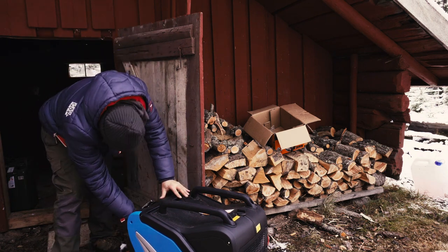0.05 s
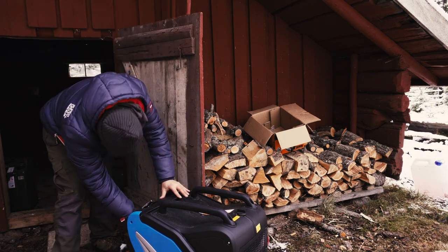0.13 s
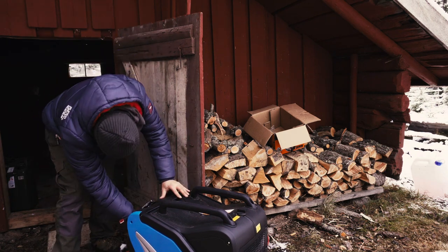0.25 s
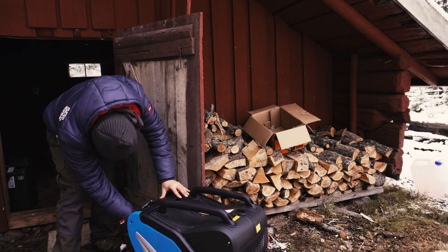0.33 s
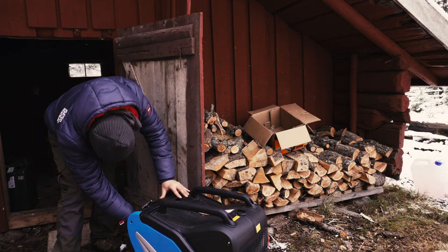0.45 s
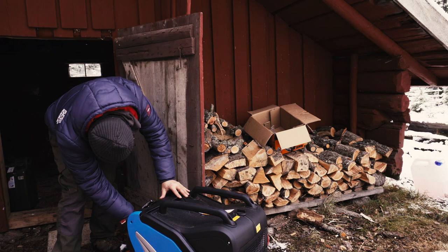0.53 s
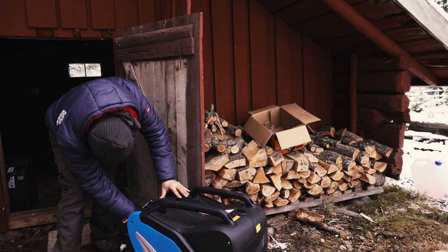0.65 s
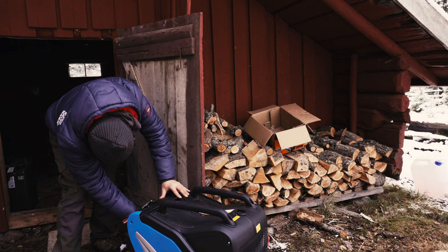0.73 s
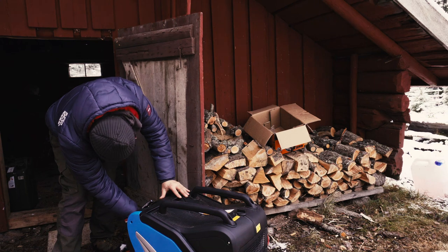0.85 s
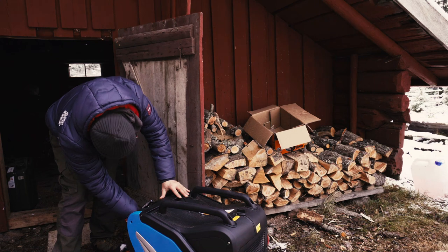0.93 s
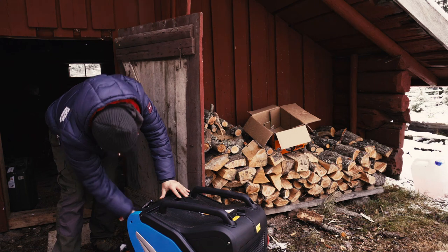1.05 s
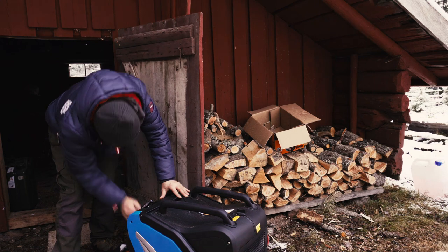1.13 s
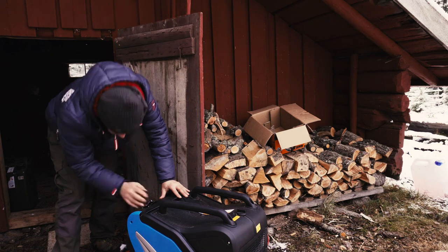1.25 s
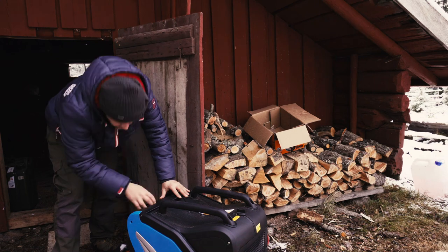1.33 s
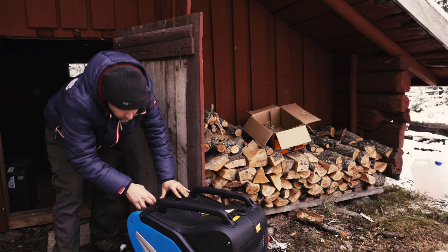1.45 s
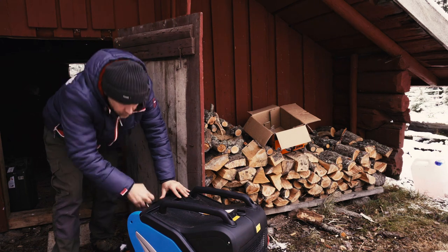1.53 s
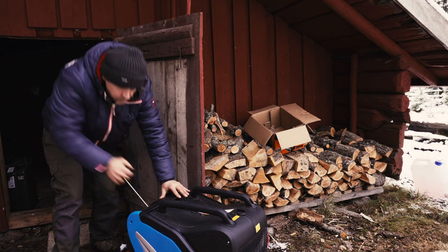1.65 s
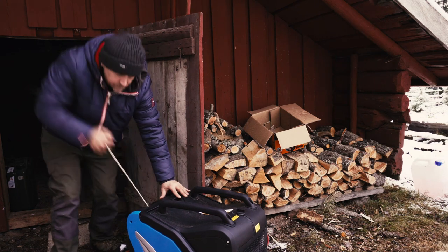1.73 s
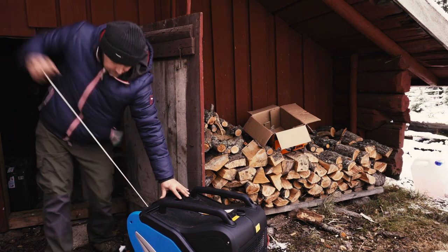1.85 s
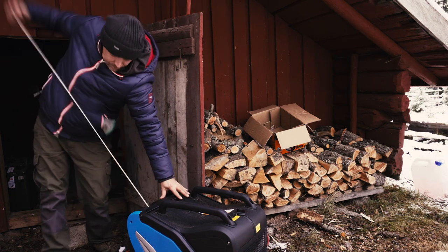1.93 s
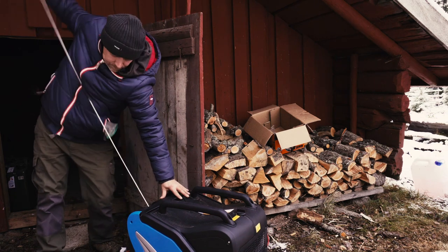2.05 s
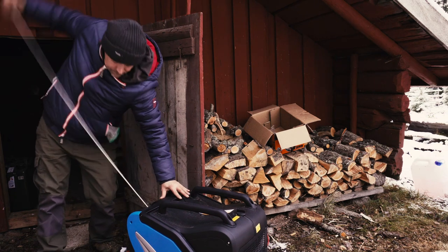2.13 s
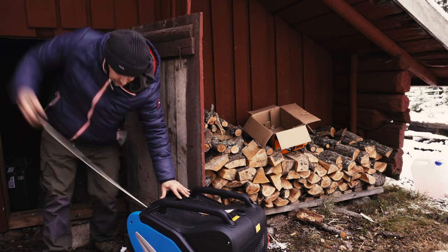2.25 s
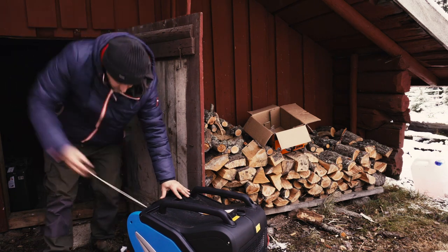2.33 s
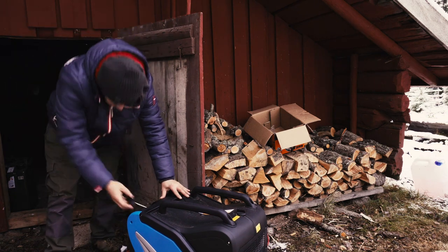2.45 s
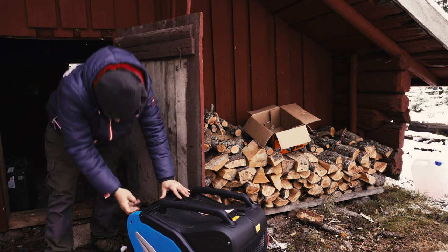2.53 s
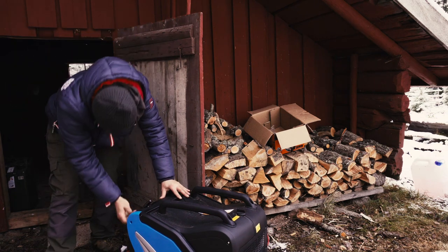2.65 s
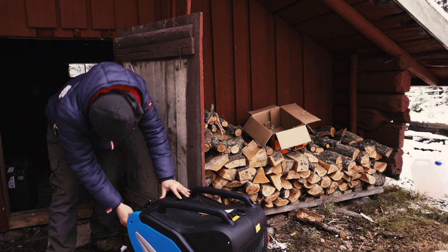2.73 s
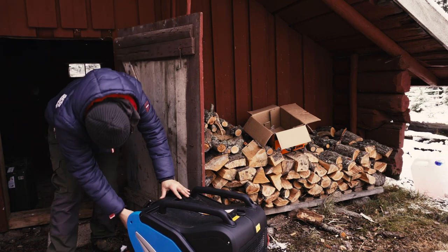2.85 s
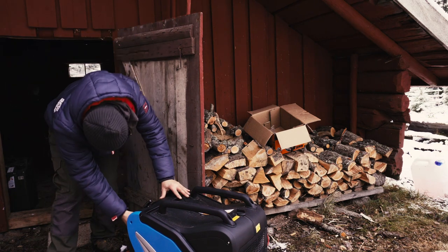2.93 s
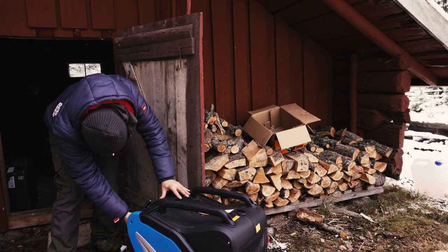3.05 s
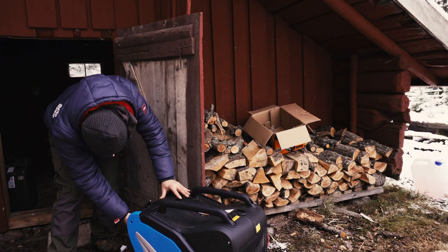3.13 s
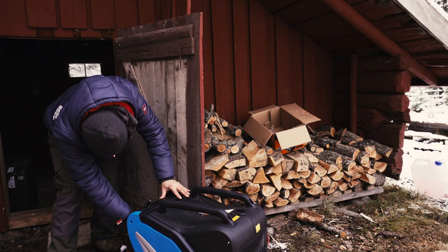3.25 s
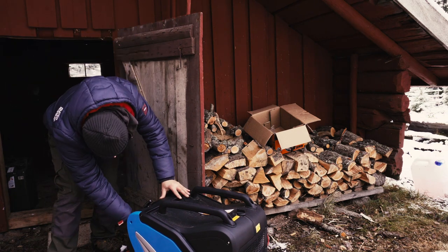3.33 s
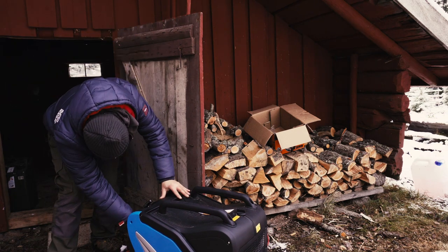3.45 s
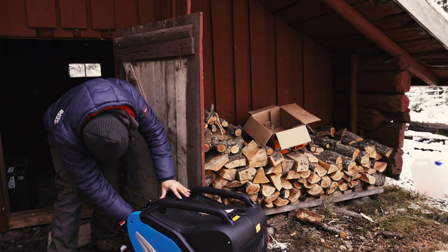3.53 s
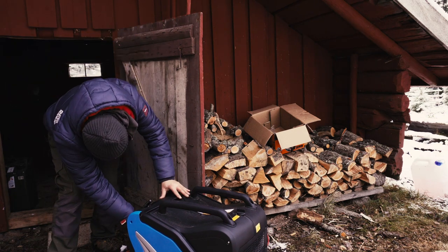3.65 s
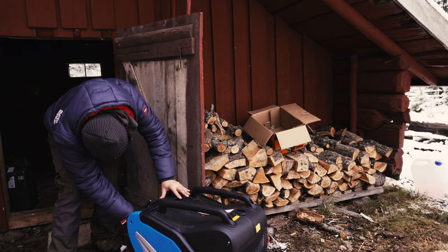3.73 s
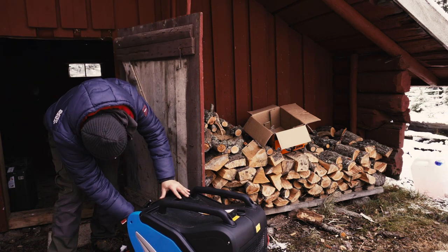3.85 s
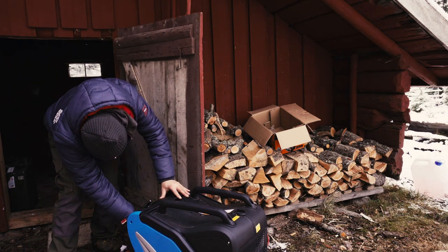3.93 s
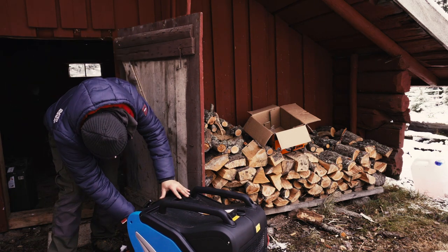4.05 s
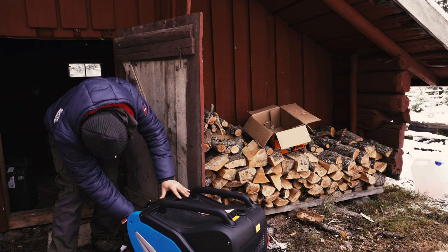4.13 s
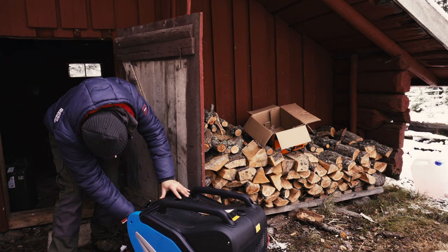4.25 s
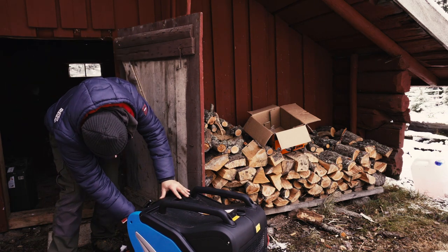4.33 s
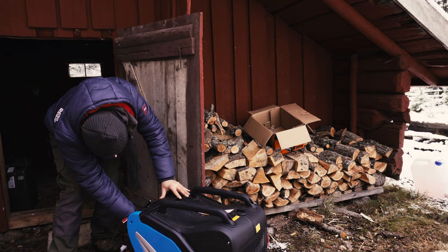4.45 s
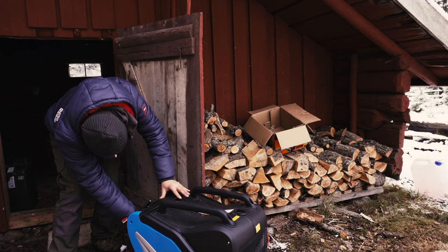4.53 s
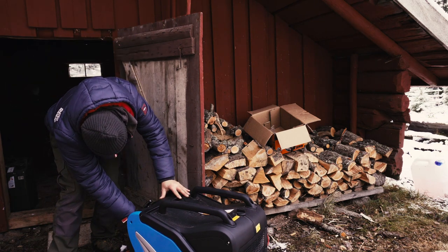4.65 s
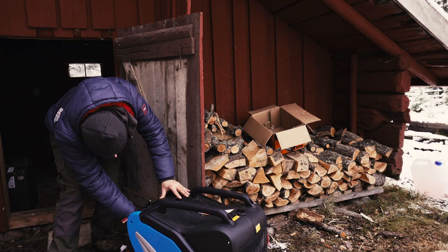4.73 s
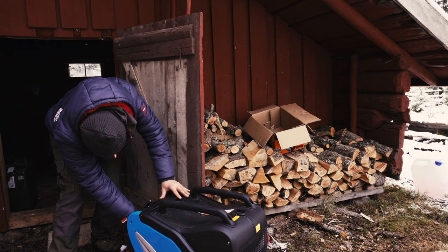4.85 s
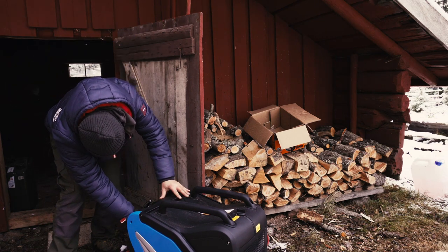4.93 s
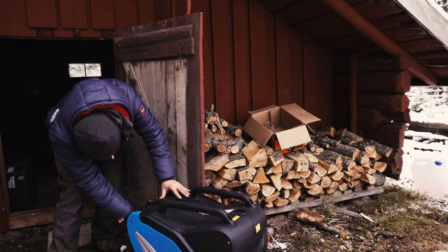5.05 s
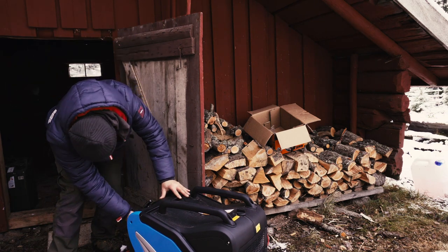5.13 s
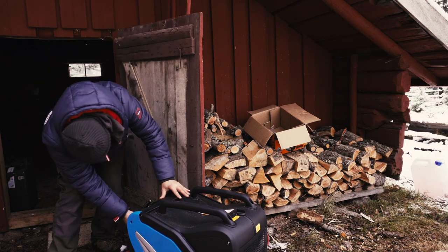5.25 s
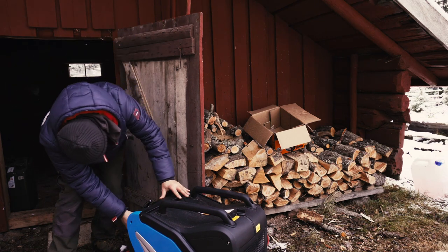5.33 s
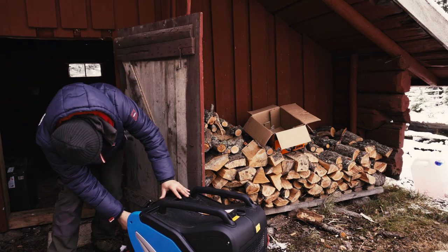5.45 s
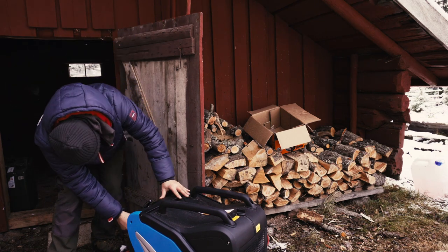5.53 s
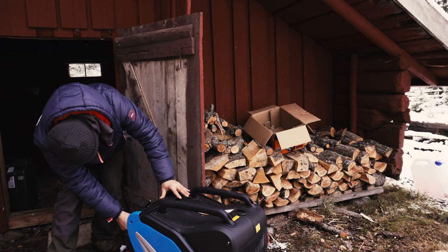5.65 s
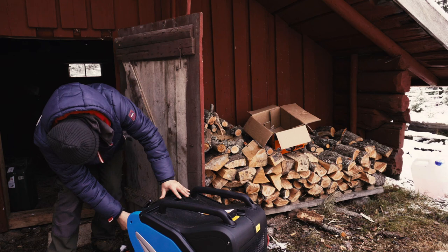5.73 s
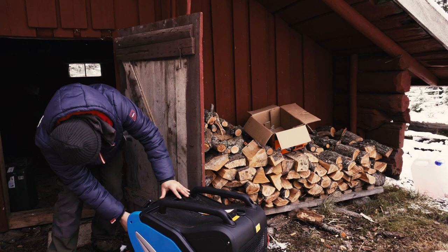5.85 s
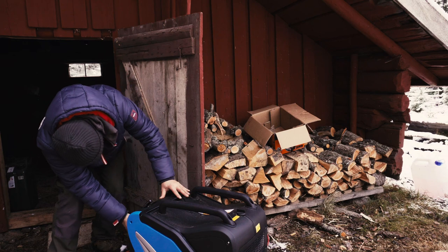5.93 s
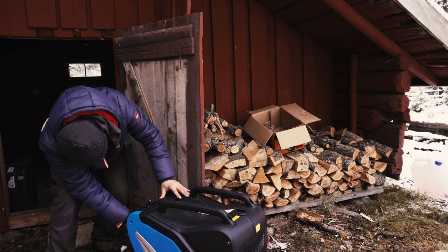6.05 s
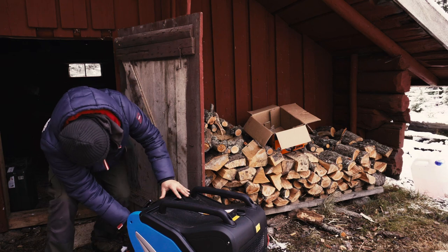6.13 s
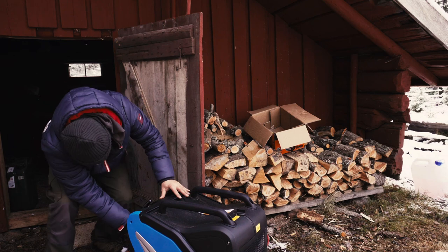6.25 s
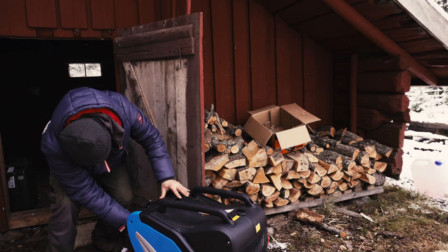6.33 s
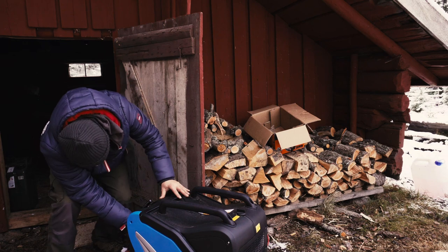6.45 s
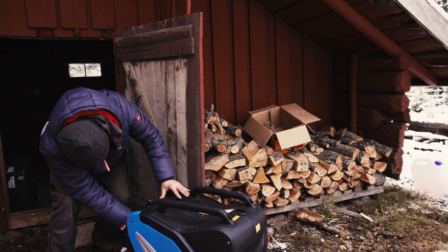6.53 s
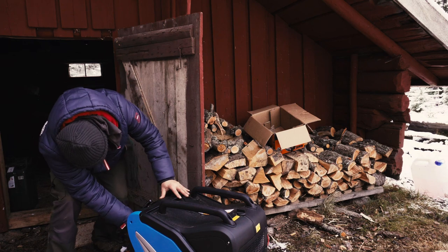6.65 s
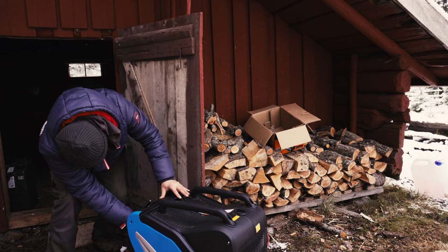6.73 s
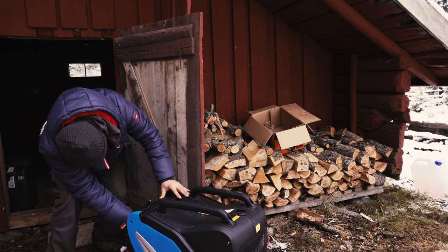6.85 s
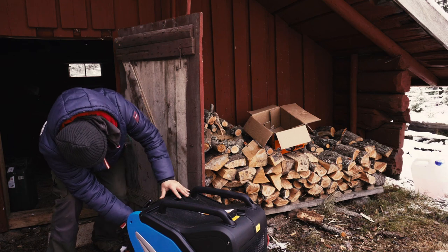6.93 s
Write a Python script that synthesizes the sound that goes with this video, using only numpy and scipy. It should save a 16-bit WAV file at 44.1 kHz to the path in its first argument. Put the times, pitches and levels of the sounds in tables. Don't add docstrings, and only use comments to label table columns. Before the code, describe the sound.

Quiet outdoor air with soft low wind, swelling slightly around 0.6 s, with very faint squeaks and rustles. Small knob clicks at 0.95 and 1.2 s, a firmer snap at 1.38 s. At 1.65 s a hard clack starts the cord pull: a rough ratchet whine climbs in gripping pulses until about 2.0 s. From 2.0 s the single cylinder knocks slowly, roughly thirteen per second, each blow shaking loose casing parts, with lighter valve clacks and tinny ringing taps between. Around 2.5-2.6 s there is a short bright squeak and hollow knocks as the handle returns. At 3.6 s the engine catches; knocks crowd together with brighter metallic rings. By 4.5 s it is a fast, even, buzzing clatter over a low exhaust thump, with slight stumbles, more noticeable around 6.2-6.4 s. Wind gusts press the microphone from about 6 s; the engine is still running at 7 s. Close stereo, short echoes.

```python
import sys
import numpy as np
from scipy import signal
from scipy.io import wavfile
from scipy.ndimage import uniform_filter1d

SR = 44100
rng = np.random.default_rng(int(sys.argv[2]) if len(sys.argv) > 2 else 0)


def store_wav(level_fs):
    pcm = np.round(np.clip(np.atleast_2d(level_fs), -1, 1) * 32767)
    wavfile.write(sys.argv[1], SR, pcm.T.astype(np.int16))


def volts_from_db(level):
    exponent = np.asarray(level, float) / 20
    return 10 ** exponent


N = 308055
TIME = np.arange(N) / SR


def noise():
    return rng.standard_normal(N)


def evened(x):
    return x / np.sqrt(np.mean(x ** 2) + 1e-20)


def curve(rows, column):
    rows = np.array(rows)
    return np.interp(TIME, rows[:, 0], rows[:, column])


def colour(x, shape, peaks=(), under_db=0):
    hz = np.fft.rfftfreq(8192, 1 / SR)
    f, db = np.transpose(shape)
    smooth_db = np.interp(np.log(hz + 1), np.log(f + 1), db, -70, -70)
    power = volts_from_db(2 * (smooth_db + under_db))
    for centre, width, top in peaks:
        power = power + volts_from_db(2 * top) / (1 + (2 * (hz - centre) / width) ** 2) ** 2
    log_gain = np.log(np.concatenate([power, power[-2:0:-1]]) + 1e-9) / 2
    taps = np.fft.ifft(np.exp(np.conj(signal.hilbert(log_gain)))).real
    return evened(signal.oaconvolve(x, taps)[:N])


def resonate(x, hz, width):
    r = np.exp(-np.pi * width / SR)
    if np.isscalar(hz):
        pole = r * np.exp(2j * np.pi * hz / SR)
        return 2 * signal.lfilter([(1 - r) ** 2], [1, -2 * pole, pole ** 2], x).real
    turn = np.exp(2j * np.pi * np.cumsum(hz) / SR)
    return 2 * (turn * signal.lfilter([(1 - r) ** 2], [1, -2 * r, r * r], x / turn)).real


def train(times, gains):
    x = np.zeros(N)
    at = np.round(np.asarray(times) * SR).astype(int)
    np.add.at(x, at[at < N], np.asarray(gains)[at < N])
    return x


def dying(x, t60):
    return signal.lfilter([1], [1, -10 ** (-3 / t60 / SR)], x)


def ring(x, modes):
    t = np.arange(SR // 3) / SR
    sound = sum(volts_from_db(db - 60 * t / t60) * np.sin(2 * np.pi * hz * t) for hz, db, t60 in modes)
    return signal.oaconvolve(x, sound)[:N]


def grit(lumps_db, size):
    lumps = evened(uniform_filter1d(noise(), size))
    return noise() * volts_from_db(lumps_db * lumps)


# frequency in Hz, level in dB.
AIR = [(26, -20), (45, 1), (183, -9.5), (245, -14), (329, -9.5), (672, -18), (2190, -19.5), (3240, -20.5),
       (4680, -24.5), (5840, -26), (16000, -37.5)]
# frequency in Hz, level in dB.
AIR_SIDE = [(26, -32), (45, -8), (81, 7), (109, -3.5), (382, -11.5), (411, -18.5), (2190, -30.5),
            (4460, -24), (16000, -31)]
# frequency in Hz, level in dB.
GUST = [(5, -10), (12, 0), (28, -2), (45, -12), (70, -26), (120, -45)]
# peak in seconds, spread in seconds, rise in dB.
WIND = [
    (.64, 0.26, 8.5),
    (2.4, 0.61, 6),
    (4.79, .25, 1),
    (6.3, 0.82, 13.5),
]


def air():
    mid = volts_from_db(-51) * colour(noise(), AIR)
    side = volts_from_db(-53.5) * colour(noise(), AIR_SIDE)
    left, right, across = [colour(grit(3.0, size=4000), GUST) for _ in range(3)]
    wind_db = -56 + sum(rise * np.exp(-((TIME - s) / spread) ** 2) for s, spread, rise in WIND)
    lumps = np.array([volts_from_db(3) * left + 2 * across, volts_from_db(-3) * right - 2 * across])
    return np.array([mid + side, mid - side]) + volts_from_db(wind_db) * lumps


# start in seconds, length in seconds, pressure.
PUFFS = [(6.085, .045, -.04), (6.12, .03, .04), (6.15, .03, .03), (6.18, .07, -.055), (6.335, .065, .045),
         (6.45, .07, -.02), (6.8, .05, .035), (6.89, .07, -.02)]


def puffs():
    bumps = (signal.oaconvolve(train([s], [push]), np.hanning(int(length * SR)))[:N]
             for s, length, push in PUFFS)
    return sum(bumps) * np.array([[1.3], [.7]])


def shed(x):
    echoes = train([.0031, .0074, .0122, .019, .028], volts_from_db([-15.5, -13.5, -12.0, -17.0, -39]))
    return x + signal.oaconvolve(x, echoes[:2000])[:N]


# start and end in seconds, start
# and end pitch in Hz, level in dB.
SQUEAKS = [(.1, 0.13, 2570, 4430, -54), (0.117, .17, 4450, 4280, -55), (0.144, 0.187, 2800, 3660, -49.5),
           (0.165, 0.213, 3430, 2670, -54), (0.292, 0.405, 2400, 2370, -56), (0.466, .53, 5970, 5900, -61),
           (2.498, 2.564, 2695, 2720, -23.5), (2.508, 2.558, 7160, 7200, -33),
           (6.591, 6.985, 641, 629, -43)]
# start and end in seconds, pitch in Hz, level in dB.
RUSTLES = [(1.437, 1.62, 1250, -60), (1.639, 1.682, 1040, -32.5), (0.219, .4, 3100, -58.5),
           (0.921, 1.0, 1730, -50), (0.946, 0.986, 536, -48.5), (1.187, 1.37, 4670, -59),
           (1.612, 1.696, 7560, -55)]


def squeaks_and_rustles():
    rubs = [(a, b, hz0, hz1, .035 * hz1, db) for a, b, hz0, hz1, db in SQUEAKS]
    rubs += [(a, b, hz, hz, .55 * hz, db) for a, b, hz, db in RUSTLES]
    out = np.zeros(N)
    for start, end, hz0, hz1, width, db in rubs:
        at, count = round(start * SR), round((end - start) * SR)
        rub = resonate(rng.standard_normal(SR // 2)[:count], np.linspace(hz0, hz1, count), width)
        out[at:at + count] += volts_from_db(db) * evened(rub) * np.hanning(count) ** .5
    return out


# start in seconds, peak in dB, t60 in seconds.
CLICKS = [(.94, -41, .1), (.971, -41, 0.074), (1.198, -30, 0.025), (1.378, -27, 0.082),
          (1.384, -17.5, 0.093), (1.396, -46, 0.11), (1.6659, -8.5, 0.049)]
# frequency in Hz, level in dB.
KNOB = [(250, -24), (550, 4), (850, -2), (1100, -2), (1350, 3), (1800, -2), (2400, -1), (3200, -1),
        (4300, -3), (5500, -14), (14000, -40)]


def knobs():
    snaps = sum(dying(train([s], [volts_from_db(db - 9)]), t60) for s, db, t60 in CLICKS)
    return snaps * colour(grit(1.5, size=60), KNOB)


# time in seconds, pitch in Hz.
REEL = [(1.665, 620), (1.69, 545), (1.727, 890), (1.76, 1250), (1.787, 1430), (1.812, 1840), (1.862, 2050),
        (1.893, 2390), (1.975, 2445)]
# centre and length in seconds, level in dB, second partial in dB.
GRIPS = [(1.674, .025, -28, -40), (1.696, .04, -27, -42), (1.727, .035, -27, -29), (1.76, .04, -22, -33),
         (1.783, .03, -33, -45), (1.812, .04, -17, -40), (1.835, .025, -28, -29), (1.849, .025, -24, -37),
         (1.879, .025, -21, -34), (1.896, .025, -22, -33), (1.916, .03, -23, -40), (1.932, .03, -21, -38),
         (1.957, .025, -24, -42)]


def reel():
    wobble = 1 + .16 * uniform_filter1d(noise(), 150)
    turns = 2 * np.pi * np.cumsum(curve(REEL, 1) * wobble) / SR
    first, second = np.zeros((2, N))
    for centre, length, db, second_db in GRIPS:
        at, count = round((centre - length / 2) * SR), round(length * SR)
        first[at:at + count] += volts_from_db(db + 3) * np.hanning(count)
        second[at:at + count] += volts_from_db(second_db + 3) * np.hanning(count)
    rough = volts_from_db(1.2 * evened(uniform_filter1d(noise(), size=60)))
    return rough * (first * np.sin(turns) + second * (np.sin(2 * turns) + .1 * np.sin(3 * turns)))


# time in seconds, four-stroke cycles done.
CRANK = [(4.027, 0), (4.185, 4), (4.484, 12), (4.631, 16), (4.917, 24), (5.496, 40), (5.791, 48),
         (6.24, 60), (6.382, 64), (6.754, 76), (7.008, 84)]
CYCLES = CRANK[-1][1]


def crank(cycles):
    whole = np.arange(CYCLES + 1)
    s, done = np.transpose(CRANK)
    period = uniform_filter1d(np.diff(np.interp(whole, done, s)), size=5, mode="nearest")
    return np.interp(cycles, whole, CRANK[0][0] + np.append(0, np.cumsum(period)))


def gearing():
    contacts = 48
    place, force = rng.random(contacts), rng.standard_normal(contacts)
    cycle = np.arange(CYCLES)[:, None]
    slack = rng.standard_normal((CYCLES, contacts))
    times = crank(cycle + place + .0006 * slack[::-1])
    return evened(train(times.ravel(), (force * (1 + 0.22 * slack)).ravel()))


def ticks():
    per_s, spread_db = 500, 3.5
    size = volts_from_db(spread_db * np.minimum(rng.exponential(1, N), 4)) * rng.choice([-1., 1.], N)
    return volts_from_db(-4) * evened(size * (rng.random(N) < per_s / SR))


# time in seconds, peak in dB, share in the casing in dB.
KNOCKS = [(2.097, -9, -12), (2.1917, -16.5, 8), (2.2735, -13.5, 5), (2.344, -8, -47), (2.421, -14, 1),
          (2.4953, -10, -18), (2.584, -17, -2.5), (2.6457, -11, -19), (2.732, -19.5, 5),
          (2.7959, -7.5, -56), (2.88, -17, 6), (2.942, -11.5, -1.5), (3.0245, -14, 0.5), (3.1027, -13.5, 2),
          (3.1728, -9.5, -32), (3.262, -16.5, 2), (3.34, -16.5, 0), (3.4114, -13, 2.5), (3.493, -14, -0.5),
          (3.5727, -8, -33), (3.6444, -9.5, -24), (3.71, -10, -40), (3.7628, -9, -24), (3.8113, -10, -31),
          (3.866, -15, 3.5), (3.9, -10, -19), (3.9513, -13, 2), (3.983, -10.5, -20)]
# time in seconds, peak in dB, casing share in dB.
CORD_KNOCKS = [(1.664, -20.5, 8), (1.813, -18.5, 0), (1.9925, -15, 0), (2.0337, -18, 3), (2.563, -19, 5),
               (2.61, -24, 5), (2.719, -23, 4)]
# time in seconds, peak in dB.
VALVES = [(2.127, -16.5), (2.224, -26), (2.3092, -17), (2.3895, -18), (2.4634, -18), (2.534, -18),
          (2.6852, -15), (2.7636, -17.5), (2.837, -17.5), (2.91, -18), (2.9831, -15.5), (3.0587, -18.5),
          (3.1378, -16), (3.2156, -18), (3.2945, -18), (3.3754, -16), (3.457, -16), (3.5394, -16.5)]
# first cycle, last cycle, thump loss in dB, knock in dB, share in the casing in dB.
STUMBLES = [(0, 4, 8, -12, -12), (5, 6, 1, -14, -4), (26, 26, 9, -21, -9), (35, 35, 7, -17, -9),
            (38, 38, 8, -12.5, 2), (47, 47, 10, -15, 3), (51, 51, 6, -10.5, 0), (57, 58, 0, -15, 2),
            (59, 64, 9, -12.5, -12), (65, 66, 4, -15.5, -2), (78, 78, 8, -30, 0), (82, 82, 5, -30, 0)]


def blows():
    clacks = [(s, db - 3, -2) for s, db in VALVES]
    late = [(crank(c) - .001, db, share) for first, last, loss, db, share in STUMBLES
            for c in range(max(first, 1), last + 1)]
    return np.transpose(CORD_KNOCKS + KNOCKS + clacks + late)


# time in seconds, level in dB, pitch in Hz, t60 in seconds.
HANDLE = [(1.884, -30.5, 643, 0.35), (1.946, -33, 344, 0.53), (2.088, -21, 544, 0.04),
          (2.184, -26.5, 218, 0.091), (2.562, -26, 537, 0.092), (2.584, -27, 640, 0.037),
          (2.61, -21, 584, 0.054), (2.624, -14, 840, 0.033), (2.626, -23.5, 568, 0.072),
          (2.684, -28.5, 502, 0.18)]


def hollow_shell():
    lead_s, pop_db, pop_hz, t60 = 0.017, -26, 494, 0.04
    pops = [(s - lead_s, pop_db, pop_hz * rng.uniform(0.76, 1.18), t60) for s, _, _ in KNOCKS[-7:]]
    for first, last, *_ in STUMBLES:
        if last - first > 2:
            pops += [(crank(c) - lead_s, pop_db - 4.5, 0.85 * pop_hz * rng.uniform(0.74, 1.28), t60)
                     for c in range(first + 1, last + 1)]
    out = np.zeros(N)
    for s, db, hz, t60 in HANDLE + pops:
        soft = np.hanning(int(SR / hz / 2)) * 5 * hz / SR
        push = signal.oaconvolve(train([s], [volts_from_db(db)]), soft)[:N]
        out += ring(push, [(hz, 0, t60), (1.7 * hz, -3, 1.6 * t60)])
    return out


# time in seconds, peak in dB.
TAPS_COVER = [(1.9712, -17), (2.0367, -17), (2.087, -19), (2.2816, -24), (2.334, -20), (2.4073, -28),
              (2.441, -28), (2.555, -22), (2.6213, -20), (2.6817, -22), (2.8564, -31), (2.9266, -20),
              (3.076, -24), (3.1576, -22), (3.2339, -30), (3.3143, -22), (3.395, -20), (3.475, -22),
              (3.5607, -22), (3.6325, -19), (3.7424, -19), (3.8505, -23), (3.947, -25), (4.025, -25)]
TAPS_PANEL = [(1.9548, -18), (2.0277, -37), (2.1259, -28), (2.1858, -20), (2.3095, -19), (2.4427, -20),
              (2.4861, -31), (2.5634, -22), (2.5929, -23), (2.6448, -29), (2.6896, -30), (2.743, -23),
              (2.9391, -22), (3.0336, -16), (3.1122, -22), (3.1686, -16), (3.2713, -17), (3.3277, -26),
              (3.433, -17), (3.4938, -22)]
# time in seconds, peak in dB, pitch in Hz.
TAPS_FRAME = [(2.026, -14, 1740), (2.0596, -20, 1950), (2.1259, -21, 2030), (2.185, -22, 1700),
              (2.2735, -22, 1670), (2.3424, -20, 1920), (2.4203, -19, 1720), (2.4944, -15.5, 1820),
              (2.7934, -19.5, 1930), (2.8698, -20, 1710), (2.9411, -28, 1860), (3.248, -29, 1730),
              (3.3274, -25, 1770), (3.4087, -23, 1790), (3.5704, -17, 1840), (3.6465, -24, 2030),
              (3.7093, -21, 1830), (3.7552, -22, 1840), (3.8103, -15, 1930), (3.857, -12, 1834),
              (3.8989, -20, 2000), (3.9817, -17, 1910), (4.0326, -21, 1870), (4.0644, -19, 1740)]


def clatter():
    cover_hz, panel_hz, valve_hz = 1345, 2268, 3012
    rise_s, t60 = 0.0017, 0.047
    rows = [(s, db, cover_hz) for s, db in TAPS_COVER]
    rows += [(s, db, panel_hz) for s, db in TAPS_PANEL]
    rows += [(s, db, valve_hz) for s, db in VALVES] + TAPS_FRAME
    out, t = np.zeros(N), np.arange(SR // 8) / SR
    for s, db, hz in rows:
        detune, phase = rng.standard_normal(2)
        tap = np.minimum(t / rise_s, 1) * volts_from_db(db - 0.5 - 60 * np.maximum(t - rise_s, 0) / t60)
        out[round(s * SR):][:len(t)] += tap * np.sin(2 * np.pi * (hz * (1 + .006 * detune) * t + phase))
    return out


# time in seconds, level in dB.
SHAKE = [(1.42, -58), (1.54, -61.5), (1.62, -41), (1.68, -31.5), (1.84, -29.5), (1.98, -24.5),
         (2.04, -24.5), (2.5, -26), (2.8, -25.5), (3.47, -23), (3.65, -27), (4.07, -28), (4.52, -28.5),
         (6.17, -29), (6.31, -33), (6.5, -29), (6.75, -29), (6.99, -29.5)]
# time in seconds, fizz in dB, panel hum in dB.
STAGES = [(1.54, 9, -14), (1.62, -4, -27), (1.7, -10, -6.5), (1.9, -2.5, -9.5), (2.3, -5.5, -8.5),
          (3.47, -9.5, -10.5), (3.65, 1, -11.5), (4.5, 0.5, -14), (6.17, 0.5, -12.5), (6.31, 2.5, -10),
          (6.5, 1, -10.5)]
# frequency in Hz, level in dB.
PULL = [(350, -29), (600, 2), (714, -6), (1570, 5.5), (1960, -1), (2860, -11), (6000, -24), (7800, -38),
        (13200, -120)]
SLOW = [(410, -61), (700, -10.5), (1210, 5.5), (1320, 1), (1470, 6), (3090, -2), (3800, -19), (4940, -7),
        (8360, -120)]
FAST = [(410, -33), (700, -39.5), (1090, -20), (1460, -4), (1850, -4), (2400, -12), (2780, -6),
        (3800, -19.5), (4940, -48), (8360, -120)]
FIZZ = [(1940, -1.5), (3300, 1.5), (3530, -5), (4240, -2), (6600, -13.5), (7490, -17), (9940, -19),
        (14600, -36), (16000, -33)]
HUM = [(41, -20), (70, -8), (113, -0.5), (329, 3), (384, -4), (444, 5), (1000, -0.5), (1300, 6),
       (2200, -120)]
HUM_FAST = [(110, -20), (200, -11), (300, -5), (450, -2), (650, -3), (900, -1), (1200, -15)]
# centre in Hz, width in Hz, level in dB.
SLOW_PEAKS = [(1120, 20, -2), (1351, 40, 8), (1550, 18, 6), (1761, 90, 3), (2057, 20, 6), (2264, 60, 7),
              (2613, 16, 11), (2699, 22, 8), (2792, 16, 9), (2996, 80, 2), (3205, 25, 6)]
FAST_PEAKS = [(1107, 32, -3), (1257, 40, -6), (1364, 25, -3), (1780, 50, -3), (1893, 90, -4),
              (2052, 30, -3), (2277, 45, -1), (2610, 30, -3), (2706, 45, -1), (2789, 30, -1),
              (2880, 40, -4), (3255, 70, -5)]
FIZZ_PEAKS = [(4190, 70, 1), (4550, 40, -3), (4910, 40, -5), (5200, 130, -4), (6630, 50, -10),
              (7130, 90, -13), (9350, 60, -17), (9680, 110, -17)]
HUM_PEAKS = [(622, 37, 0)]
JOLT_RISE_S = 0.012


def shaking():
    fast = np.clip((TIME - 3.8) / 0.64, 0, 1)
    pull = np.clip((1.95 - TIME) / 0.15, 0, 1)
    rattle = grit(3.5, size=300) + 1.5 * ticks()
    scraping = pull * colour(rattle, PULL)
    chugging = (1 - pull) * colour(rattle, SLOW, SLOW_PEAKS, under_db=-6)
    angle = 2 * np.pi * np.interp(TIME, *np.transpose(CRANK))
    beat = volts_from_db(fast * 2 * np.sin(2 * angle + 1.2))
    drive = beat * (grit(1.4, size=200) + ticks()) + volts_from_db(-5) * gearing()
    at_speed = colour(drive, FAST, FAST_PEAKS, under_db=-3)
    casing = np.sqrt(1 - fast) * (scraping + chugging) + np.sqrt(fast) * at_speed
    fizz = colour(beat * (grit(1.6, size=120) + .6 * ticks()), FIZZ, FIZZ_PEAKS, under_db=-2)
    panel, thin = grit(1.5, size=400), fast + pull
    hum = (1 - thin) * colour(panel, HUM, HUM_PEAKS, under_db=-4)
    hum += thin * colour(panel, HUM_FAST, HUM_PEAKS)
    on = np.clip((TIME - SHAKE[0][0]) / 0.014, 0, 1)
    jolts = np.minimum(dying(train(np.transpose(KNOCKS)[0], np.ones(len(KNOCKS))), .2), 1)
    swell = uniform_filter1d(jolts, int(JOLT_RISE_S * SR)) - 1.68
    throb = volts_from_db(3.5 * swell * (TIME > KNOCKS[0][0]) * (0.5 - fast))
    parts = casing + volts_from_db(curve(STAGES, 1)) * fizz + volts_from_db(curve(STAGES, 2)) * hum
    return on * throb * volts_from_db(curve(SHAKE, 1)) * parts


# frequency in Hz, level in dB.
CRACK = [(1760, -32), (3000, 1), (4380, 8), (7150, -1), (7830, -2.5), (11400, -15), (14700, -19.5),
         (16000, -39)]
# pitch in Hz, level in dB against the knock, t60 in seconds.
METAL = [(4560, -46, 0.26), (5270, -42, 0.42), (6630, -49, 0.45), (6900, -49, 0.26), (8100, -51, 0.3),
         (8930, -50, 0.25)]
# time in seconds, pitch in Hz, level in dB, t60 in seconds.
CLANGS = [(1.632, 7750, -50, .3), (1.665, 7800, -41, .12), (1.812, 9200, -37, .06), (1.99, 4130, -30, 0.16),
          (2.035, 5200, -35, .11), (2.35, 4560, -36, 0.69), (2.66, 6630, -37, 0.23),
          (3.575, 2700, -27.5, 0.73), (3.58, 6630, -42, .5), (3.77, 6630, -39, .3), (3.905, 5270, -40, .4),
          (3.99, 5270, -32, 0.32), (4.07, 5270, -33, 0.27), (3.905, 6630, -38, 0.34),
          (3.65, 5270, -29, 0.44), (3.65, 8100, -36, 0.48)]


def knocks():
    s, db, casing_db = blows()
    hits = train(s, volts_from_db(db))
    jolt_rise, blunt_rise = int(JOLT_RISE_S * SR), int(.006 * SR)
    swing = uniform_filter1d(dying(train(s, volts_from_db(db + casing_db)), 0.082), jolt_rise)
    blunt = train(s, volts_from_db(db) * (casing_db > 0))
    edge = dying(hits - blunt, .04) + uniform_filter1d(dying(blunt, .06), blunt_rise, origin=60)
    crack = colour(grit(1.8, size=40), CRACK) * .5 * edge
    tail = colour(noise(), FIZZ, FIZZ_PEAKS) * 0.14 * dying(hits, 0.22)
    jolt = colour(noise(), SLOW, SLOW_PEAKS) * 0.5 * swing
    buzz, rings = noise(), np.zeros(N)
    for at, hz, top, t60 in CLANGS:
        rings += evened(resonate(buzz, hz, 110)) * dying(train([at], [volts_from_db(top)]), t60)
    caught_db = 5 * ((s > 3.56) & (s < crank(2)))
    for hz, part_db, t60 in METAL:
        luck_db = 3.5 * rng.standard_normal(len(s))
        struck = train(s, volts_from_db(db + part_db + caught_db - 0.29 * casing_db + luck_db))
        rings += evened(resonate(buzz, hz, 140)) * dying(struck, t60)
    return crack + tail + jolt + rings


# centre in Hz, width in Hz, level in dB.
MUFFLER = [(137, 30, -9), (212, 110, 0), (310, 90, -14)]
# centre in Hz, width in Hz, level in dB, growth in dB per cycle/s.
INTAKE = (1280, 800, -36, 1.3)
# place in the cycle 0-1, centre in Hz, width in Hz, level in dB,
# burst length in seconds, noisy share 0-1.
STROKES = [(.9, 1885, 160, -18.5, .004, .2), (.1, 1870, 170, -22, .005, .4), (.6, 1108, 80, -25, .004, .2),
           (.87, 1108, 60, -30, .004, .3), (.52, 2277, 120, -27, .003, .3), (.9, 2277, 120, -28, .003, .4),
           (.56, 2750, 200, -27, .004, .5), (.1, 2750, 200, -29, .004, .5), (.5, 3250, 300, -27, .003, .6),
           (.43, 4200, 400, -27, .003, .6), (.07, 4200, 400, -28, .005, .7), (.5, 5300, 1200, -26, .003, 1),
           (.04, 5200, 900, -29, .002, 1), (.95, 6400, 900, -33, .008, 1), (.47, 6800, 1200, -35, .003, 1),
           (.9, 8400, 900, -37, .006, 1), (.5, 10200, 2500, -40, .002, 1), (.05, 13000, 1500, -50, .008, 1)]


def firing():
    cycle = np.arange(CYCLES)
    chance = rng.standard_normal((CYCLES, len(STROKES) + 2))
    at = crank(cycle)
    loss_db = sum(row[2] * ((cycle >= row[0]) & (cycle <= row[1])) for row in STUMBLES)
    pops = train(at - .005 + .0005 * chance[:, 0], volts_from_db(1.8 * chance[:, 1] - loss_db))
    thump = volts_from_db(-44.3) * evened(sum(volts_from_db(db) * resonate(pops, hz, w) for hz, w, db in MUFFLER))
    out = signal.sosfilt(signal.butter(4, 115, "high", fs=SR, output="sos"), thump)
    hz, width, db, growth_db = INTAKE
    speed = uniform_filter1d(1 / (crank(cycle + 1) - at), 5)
    sag_db = uniform_filter1d(np.roll(loss_db, 2), 7)
    gain = np.interp(TIME, at + .09, volts_from_db(growth_db * (speed - 28) - sag_db))
    out += volts_from_db(db) * gain * evened(resonate(resonate(gearing(), hz, width), hz, width))
    effort = volts_from_db(curve(SHAKE, 1) + 23)
    for k, (place, hz, width, db, length, noisy) in enumerate(STROKES):
        taps = train(crank(cycle + place), volts_from_db(1.8 * chance[:, k + 2] - .8 * loss_db))
        burst = signal.oaconvolve(taps, np.hanning(int(length * SR) + 3))[:N] * noise()
        gas = noisy * evened(resonate(burst, hz, width))
        valve = (1 - noisy) * evened(resonate(taps, hz, width))
        out += volts_from_db(db - 10) * (gas + valve) * effort
    return out


def scene():
    hands = knobs() + hollow_shell() + squeaks_and_rustles()
    return shaking() + shed(knocks() + clatter() + reel() + hands) + firing() + air() + puffs()


def top_cut(x):
    return signal.sosfilt(signal.butter(12, 16480, fs=SR, output="sos"), x)


def record(dry):
    limit = .39
    soft = dry / (1 + (dry / limit) ** 4) ** .25
    low_pass = signal.firwin(801, 15850, window=("kaiser", 9), fs=SR)
    edged = signal.oaconvolve(soft, low_pass[None], "same")
    return top_cut(edged)


dry = scene()
out = record(dry)
store_wav(out)
```